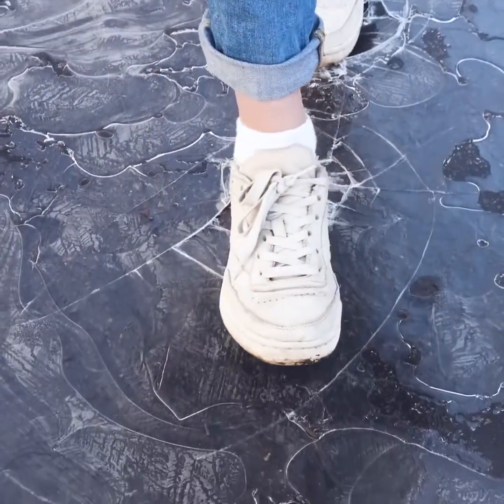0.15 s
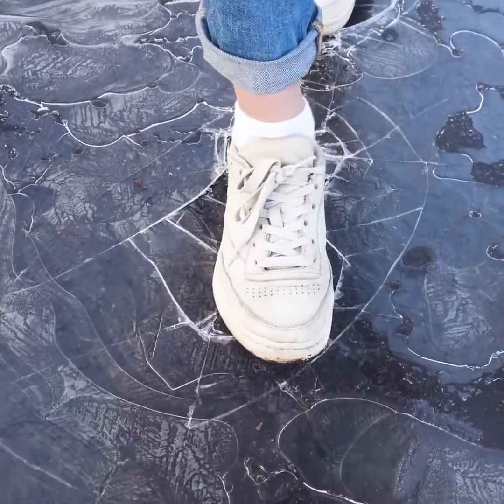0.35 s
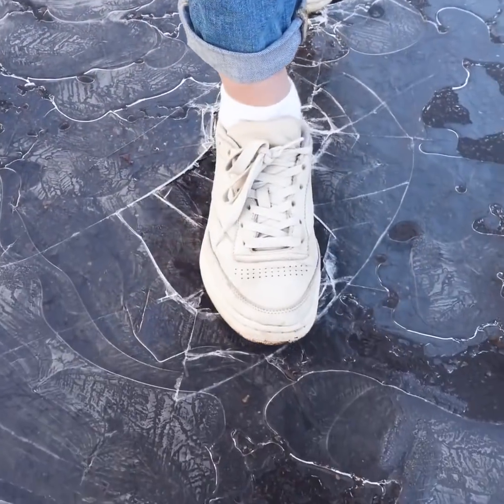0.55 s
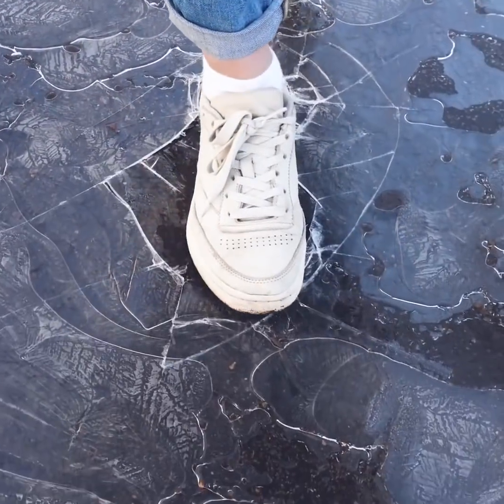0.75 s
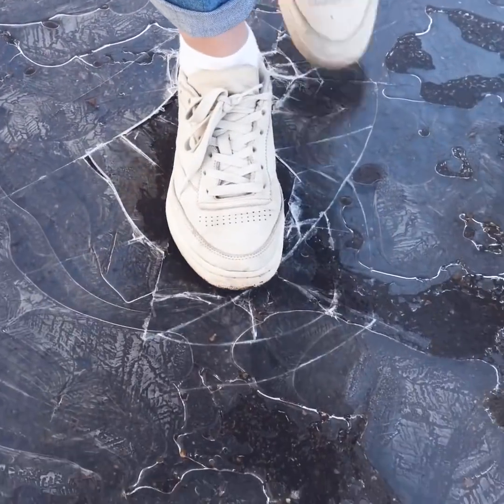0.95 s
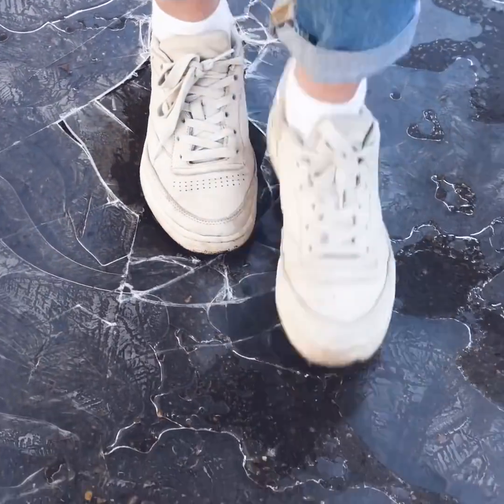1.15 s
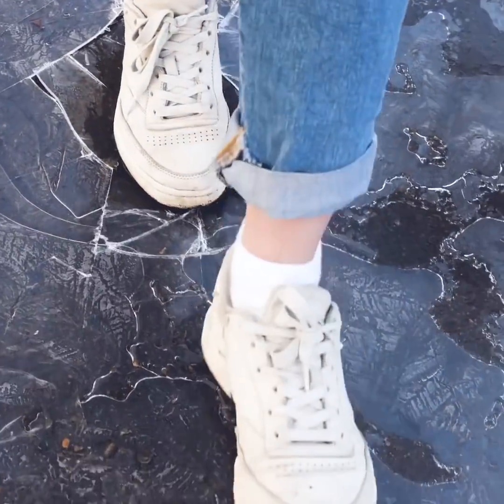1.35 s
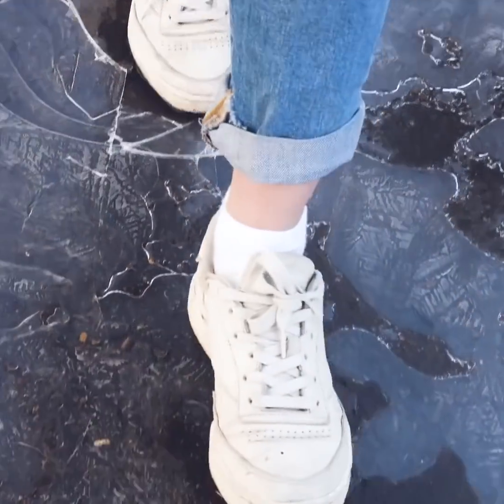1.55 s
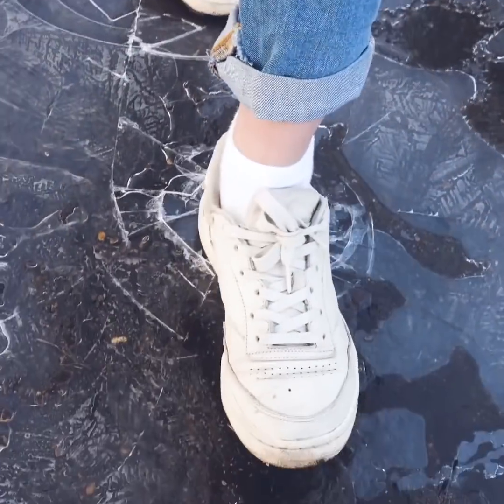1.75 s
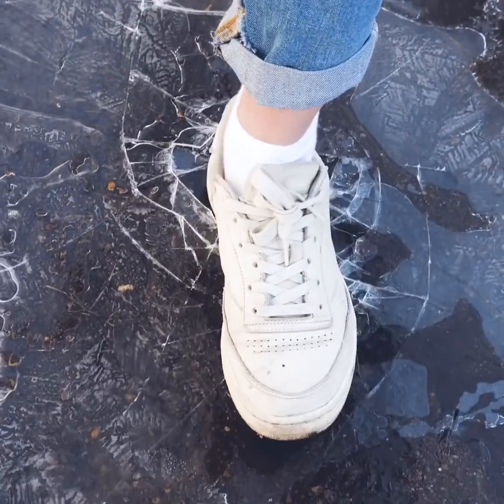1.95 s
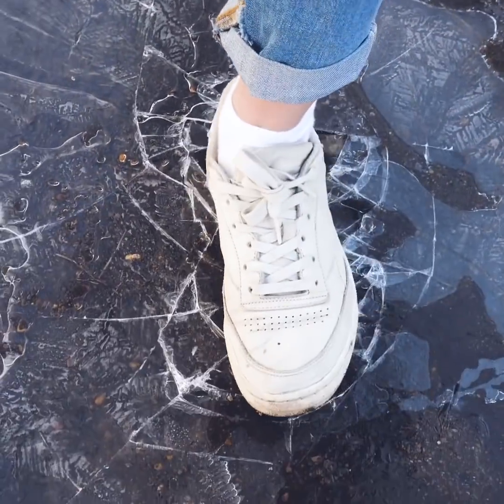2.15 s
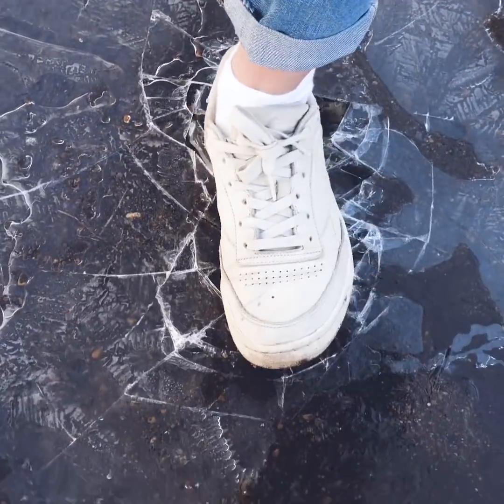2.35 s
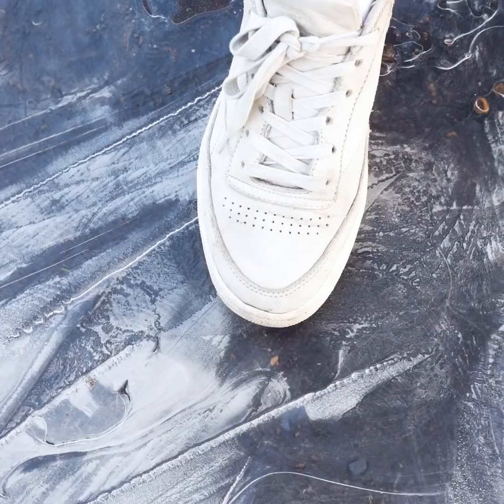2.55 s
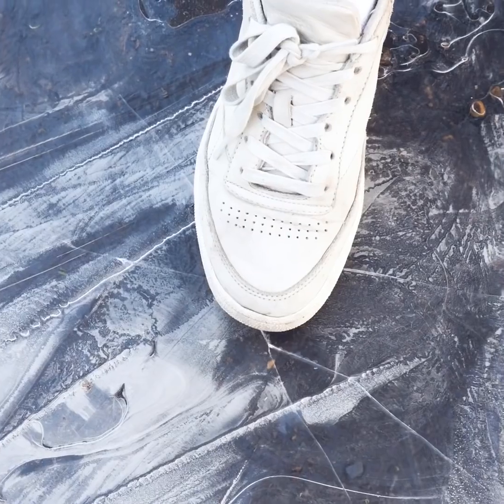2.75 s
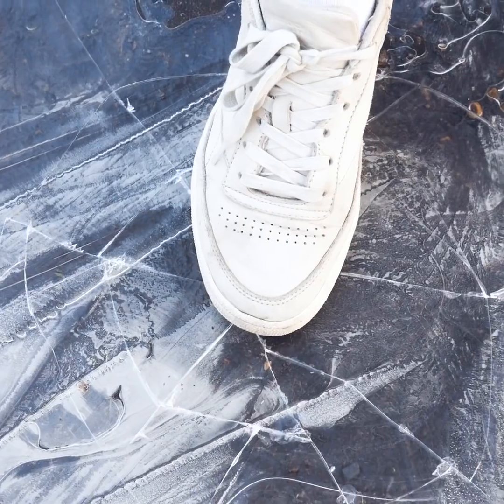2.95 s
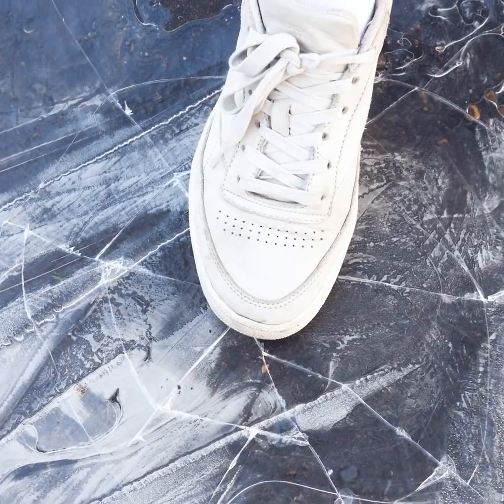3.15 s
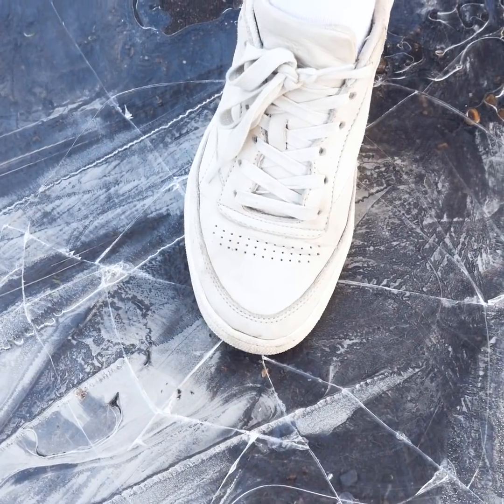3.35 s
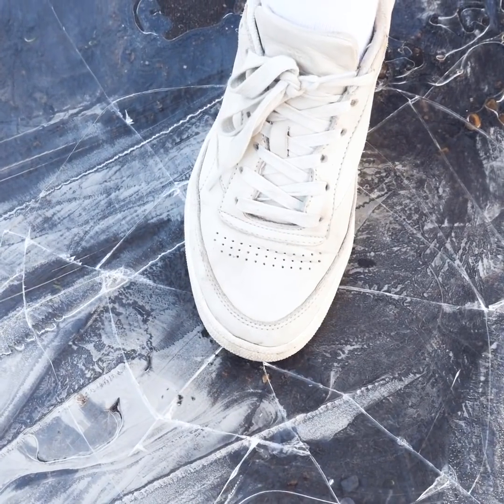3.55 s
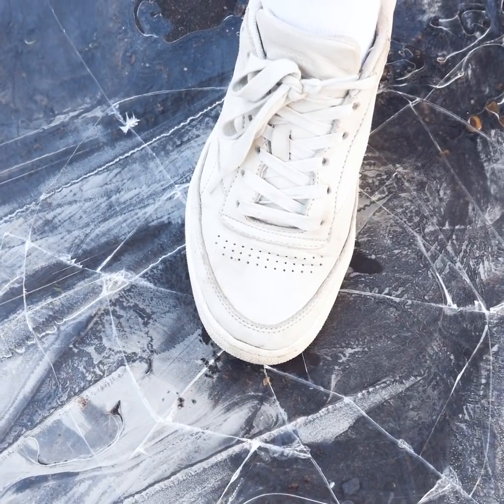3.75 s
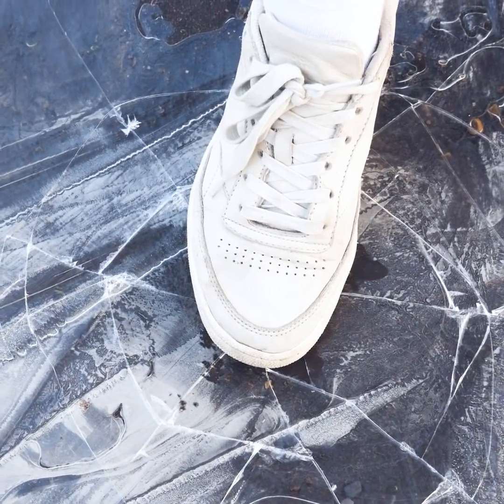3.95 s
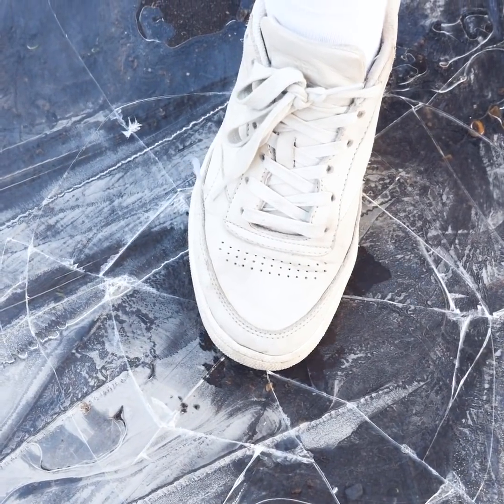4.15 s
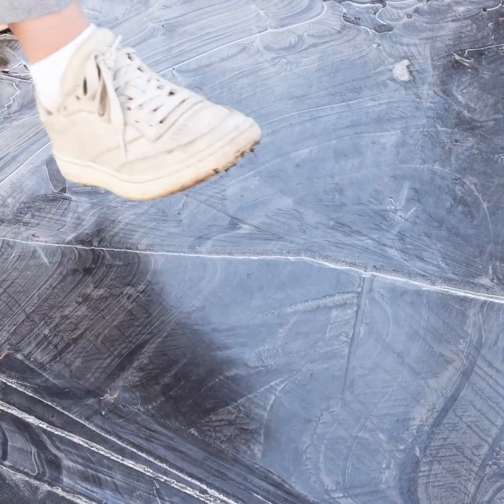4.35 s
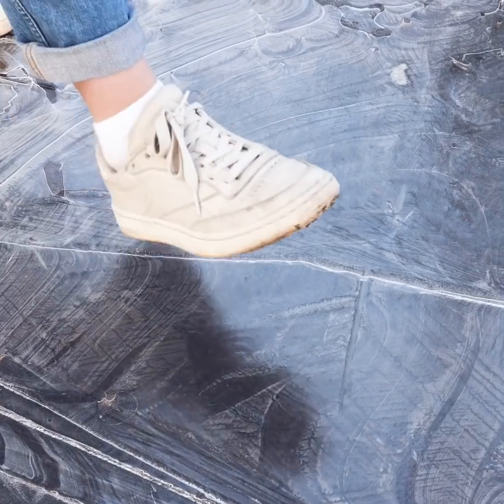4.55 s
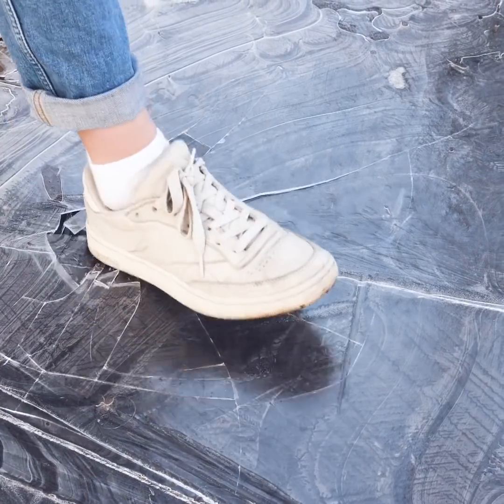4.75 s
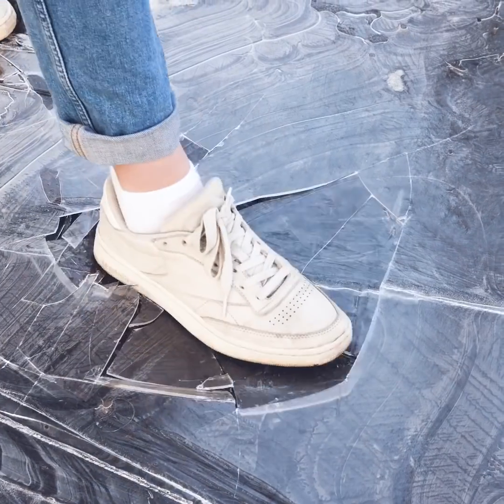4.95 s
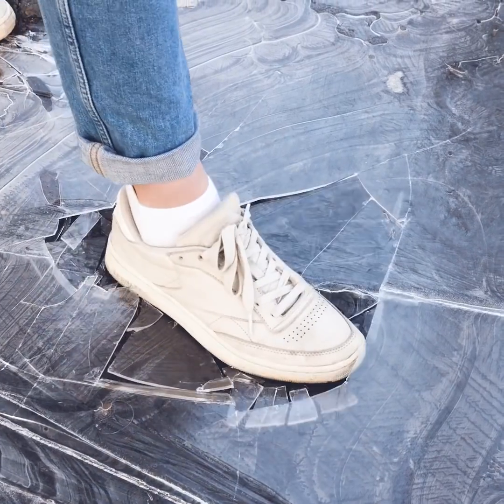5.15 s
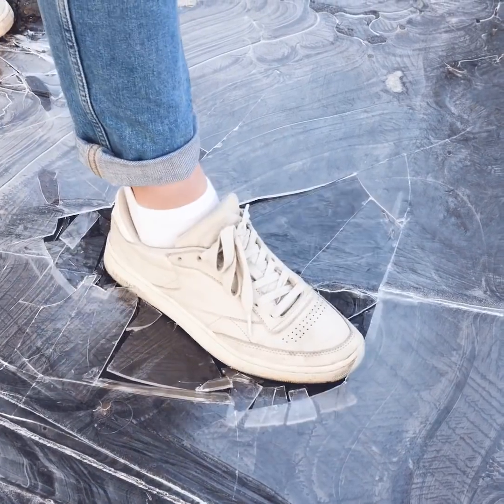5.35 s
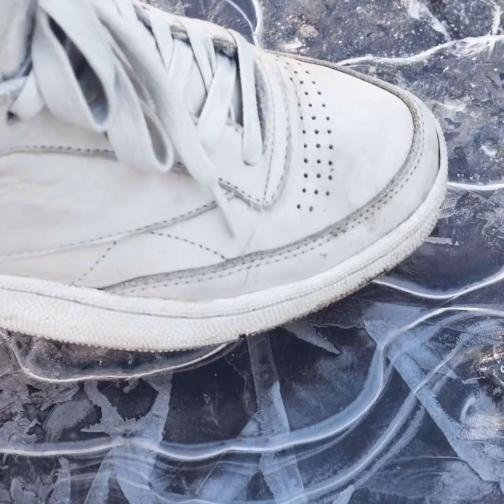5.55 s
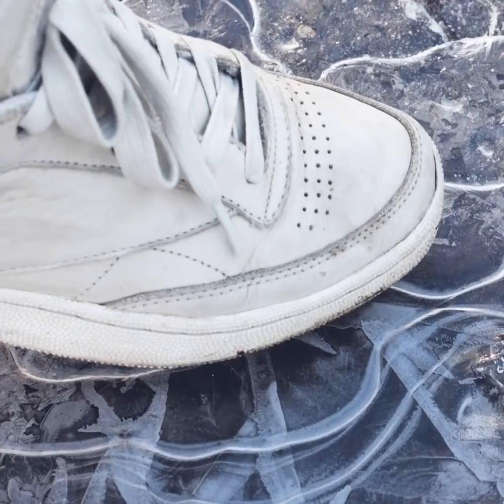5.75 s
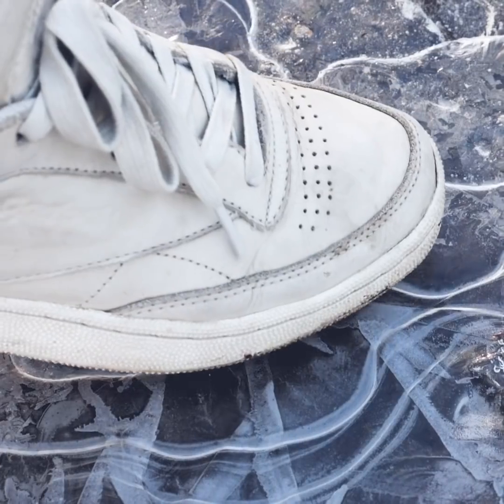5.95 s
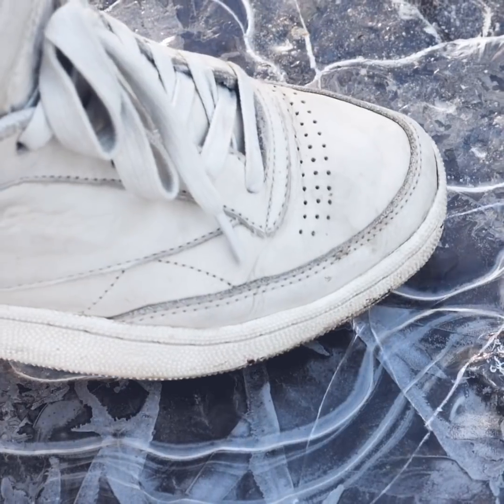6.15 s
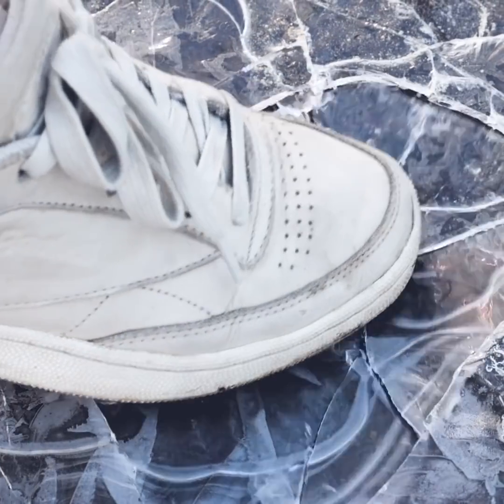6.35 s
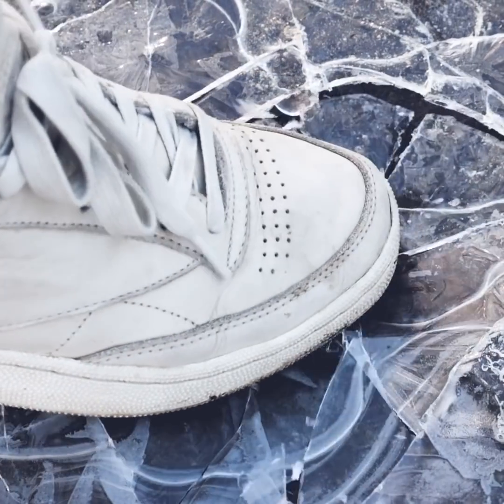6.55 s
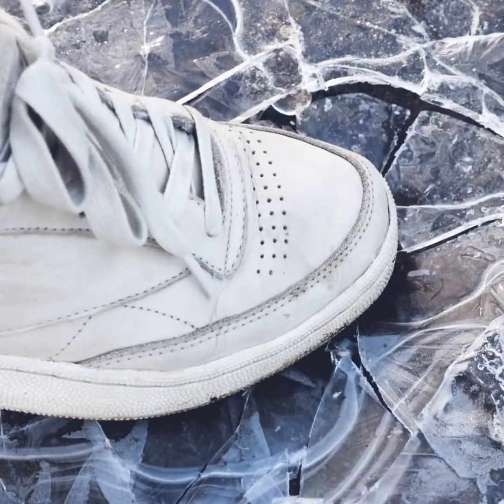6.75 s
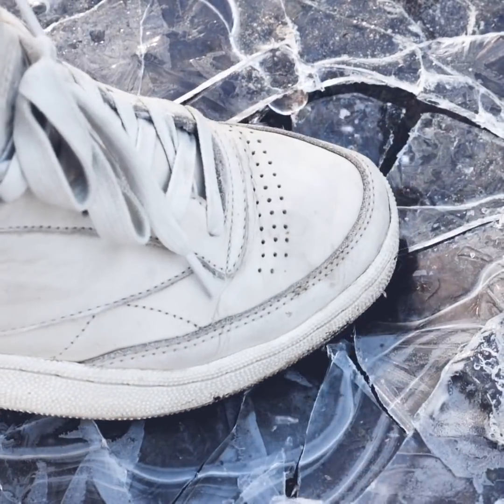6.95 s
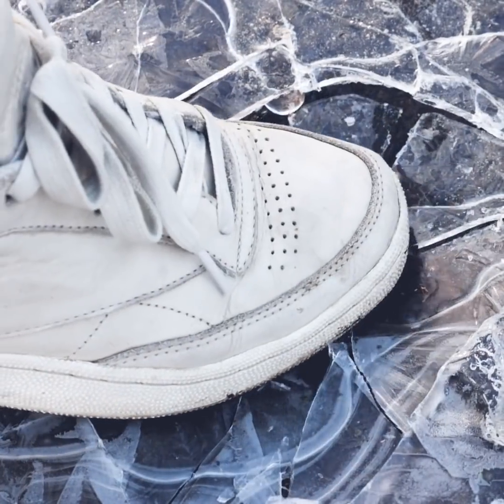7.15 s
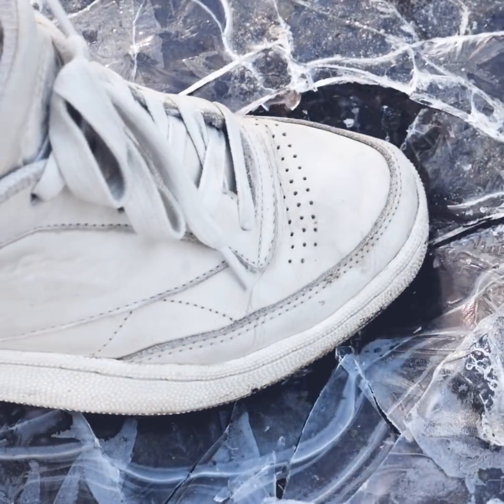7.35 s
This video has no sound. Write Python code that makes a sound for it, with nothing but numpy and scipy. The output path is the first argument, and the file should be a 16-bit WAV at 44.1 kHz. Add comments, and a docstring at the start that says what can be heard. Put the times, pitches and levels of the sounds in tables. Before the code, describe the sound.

Close-up shoes press onto thin puddle ice outdoors, with sharp snaps, glassy crunching and hollow watery thumps over a faint distant traffic hum.

```python
"""Frozen puddles outdoors: shoes press onto thin ice, heard from close by, in four parts cut together.
Single cracks are short noise bursts with a ringing knock; swarms of small ones make the crunch.
Bending waves in the ice sheet bring the treble first. Gliding tones make the thumps of water below.
Shaped noise makes the hum of far traffic and the low rumble. The last part has hardly any treble
above 6.75 kHz. Soft limits round off the loudest peaks."""
import sys
import numpy as np
from scipy import signal
from scipy.fft import rfft, irfft, next_fast_len
from scipy.io import wavfile
from scipy.ndimage import uniform_filter1d, map_coordinates

SR = 44100
rng = np.random.default_rng(int(sys.argv[2]) if len(sys.argv) > 2 else 0)


def materialize(psi):
    """Save the field psi as 16-bit PCM at rate SR to the path in sys.argv[1].

    A 1-D psi becomes a single channel; in a 2-D psi each row is a channel.
    """
    bounded = np.clip(np.atleast_2d(psi).T, -1, 1)
    quanta = np.round(bounded * 32767).astype(np.int16)
    wavfile.write(sys.argv[1], SR, quanta)


N = 330033  # length in samples

# The four parts and their steady levels: start_s, traffic_db, rumble_db,
# hollow_hum_db (steady hollow background hum, like far traffic, before the ice coloring),
# top_treble_db (gain)
PARTS = [(0, -37, -37, -31.5, 3), (2.47, -33, -41, -38.5, -1.5), (4.362, -32.5, -43, -37.5, 3),
         (5.479, -30.5, -49, -48, 0)]
TRAFFIC_COLUMN, RUMBLE_COLUMN, HOLLOW_HUM_COLUMN, TOP_TREBLE_COLUMN = 1, 2, 3, 4
LAST_START_S = PARTS[-1][0]


def amp(db):
    """Turn decibels into an amplitude factor; amp(2 * db) is the matching power."""
    return 10 ** (np.asarray(db) / 20)


def unit(x):
    """Scale a sound to an rms (average strength) of 1."""
    return x / np.sqrt(np.mean(x ** 2) + 1e-20)


def along(points, hz):
    """Read a curve of (pitch_hz, value) points on a logarithmic pitch axis."""
    point_hz, values = np.transpose(points)
    return np.interp(np.log(hz + 1), np.log(point_hz + 1), values)


def curves(rows):
    """Join timed rows by straight lines: one curve for each column after the time."""
    times, *columns = np.transpose(rows)
    return [np.interp(np.arange(N) / SR, times, column) for column in columns]


def per_part(column):
    """Hold one column of the parts table steady through each part."""
    rows = np.array(PARTS)
    part = np.searchsorted(rows[1:, 0] * SR, np.arange(N))
    return rows[part, column]


def plateaus(rows, rise, fall):
    """Level in dB of each (start, length, level, drift) row: a rise, a drifting hold, a fall."""
    start, length, db, drift = np.transpose(rows)[:4, :, None]
    t = np.arange(N) / SR - start
    hold = db + drift * np.clip(t, 0, length)
    return hold + rise * np.minimum(t, 0) - fall * np.maximum(t - length, 0)


def wobble(rate):
    """Make a smooth random curve with rate knots a second."""
    knots = rng.standard_normal(int(N * rate / SR) + 4)
    return map_coordinates(knots, [np.arange(N) * rate / SR])


def filtered(x, response):
    """Change the strength, and perhaps the delay, of each frequency in x."""
    m = next_fast_len(N + SR // 2)  # spare room at the end
    spectrum = rfft(x, m) * response(np.fft.rfftfreq(m, 1 / SR))
    return irfft(spectrum, m)[..., :N]


def rush(gain):
    """Stereo noise of rms 1, colored by a gain for each frequency and partly alike on both sides."""
    # Likeness of left and right: pitch_hz, likeness (1 = the same)
    alike = [(60, 0.97), (240, 0.97), (950, 0.84), (8000, 0.77), (13000, 0.89)]
    turn = lambda hz: np.arccos(np.clip(along(alike, hz), -1, 1)) / 2
    mid_and_side = lambda hz: gain(hz) * [np.cos(turn(hz)), np.sin(turn(hz))]
    mid, side = filtered(rng.standard_normal((2, N)), mid_and_side)
    return unit(np.array([mid + side, mid - side]))


def traffic():
    """Far roads hum: colored noise that wavers in level and steps to a new level in each part."""
    # Coloring in the first three parts, relative: pitch_hz, gain_db
    early_color = [(24, -49), (40, -21), (135, 3.5), (942, -1), (6170, -32), (14500, -22), (16000, -37.5)]
    # Coloring in the last part, relative: pitch_hz, gain_db
    last_color = [(15, -22), (25, -6), (404, -5.5), (2600, -35), (5800, -27.5), (7000, -47)]
    early = rush(lambda hz: amp(along(early_color, hz)))
    last = rush(lambda hz: amp(along(last_color, hz)))
    level_db = per_part(TRAFFIC_COLUMN) + 0.58 * wobble(7.6)
    return amp(level_db) * np.where(np.arange(N) > LAST_START_S * SR, last, early)


def rumble():
    """The loaded sheet and wind rumble: lumpy low noise, steady in each part, with swells on top."""
    # Swells of the rumble: start_s, length_s, level_db, drift_db_per_s
    swells = [(.03, 0.38, -24, -9), (.52, 0.69, -23, -4), (1.4, .13, -28, 45), (1.6, 0.87, -32, 3),
              (6.14, 0.33, -13, -3), (6.51, .15, -15, -5), (6.93, .12, -15, -40)]
    rise_db_per_s, fall_db_per_s = 1499.5, 220
    # Coloring of the rumble, relative: pitch_hz, gain_db
    low_color = [(15, -50), (50, -16), (220, 4), (400, -9), (520, -11), (880, -120)]
    swell_power = amp(2 * plateaus(swells, rise_db_per_s, fall_db_per_s)).sum(0)
    steady_power = amp(2 * per_part(RUMBLE_COLUMN))
    lumps = amp(2.8 * wobble(30))
    noise = unit(lumps * rush(lambda hz: amp(along(low_color, hz))))
    return np.sqrt(swell_power + steady_power) * noise


def thumps():
    """Squeezed water thumps and tipping plates knock: gliding tones, shorter when higher."""
    # Thumps and hollow knocks: peak_s, level_db, pitch_hz (at the peak)
    thump_rows = [(.083, -11, 530), (.106, -11, 494), (.166, -10, 470), (.553, -13, 166), (.59, -12, 239),
                  (.725, -12, 263), (.77, -14, 170), (.832, -9, 250), (.921, -14, 201), (1.06, -14, 240),
                  (1.141, -9, 192), (1.197, -14, 192), (1.288, -17, 200), (1.417, -15, 140),
                  (1.513, -12, 197), (1.601, -14, 580), (2.15, -13, 261), (2.477, -16, 220),
                  (2.617, -15, 360), (2.922, -11, 514), (2.998, -12, 600), (3.046, -11, 554),
                  (3.279, -11, 1150), (4.723, -12, 320), (4.751, -9, 460), (4.767, -10, 570),
                  (4.785, -11, 480), (4.82, -9, 633), (4.85, -12, 642), (4.937, -12, 513),
                  (5.517, -20, 366), (6.133, -6, 165), (6.2, -6, 192), (6.24, -6, 250), (6.276, -6, 215),
                  (6.357, -6, 273), (6.426, -7, 275), (6.521, -7, 232), (6.632, -8, 209), (6.773, -10, 214),
                  (6.939, -6, 230), (6.983, -5, 248)]
    life_at_200_hz_s = .016
    early_glide_per_s, last_glide_per_s = 15, -6  # relative change of pitch
    out, t = np.zeros(N + SR), np.arange(SR // 8) / SR
    for peak_s, db, hz in thump_rows:
        life = life_at_200_hz_s * np.sqrt(200 / hz)
        glide = last_glide_per_s if peak_s > LAST_START_S else early_glide_per_s
        u = t / life
        since_peak = t - life / 2
        turn = 2 * np.pi * (hz * since_peak * (1 + glide * since_peak / 2) + rng.random())
        wave = np.sin(turn) + .25 * np.sin(1.7 * turn)
        envelope = 2 * u * np.exp(.5 - 2 * u * u)  # swells to 1 at the peak, then dies
        at = round((peak_s - life / 2) * SR)
        out[at:at + len(t)] += amp(db) * envelope * wave
    return out[:N]


def overlap(k, hz):
    """Share of band k (0 hollow, 1 middle, 2 treble) at each frequency; the powers add up to 1."""
    # Where the hollow band fades into the middle one, and that into the treble: pitch_hz
    crossings = [800, 1700, 2500, 4500]
    place = np.interp(np.log(hz + 1), np.log(crossings), [0.047, 0.81, 1.21, 1.815])
    return np.cos(np.pi / 2 * np.clip(np.abs(place - k), 0, 1))


def swarm(rate, spread_db, t60):
    """Power of many small cracks at random times and sizes, evened out to a local mean near 1."""
    chance = rng.random((2, N))
    sizes = amp(-2 * spread_db * np.log(chance[1] + 1e-9))
    starts = (chance[0] < rate / SR) * sizes
    t = np.arange(int(t60 * SR) + 2) / SR
    decay = amp(-120 * t / t60)  # the power falls by 60 dB in t60 seconds
    power = np.abs(signal.fftconvolve(starts, decay)[:N])
    return power / (uniform_filter1d(power, SR // 12) + 1e-9)


def shards(rate, hz, cycles):
    """Loose pieces knock at random times, pitches and sides, each a few cycles long; rms 1."""
    rows = rng.standard_normal((int(rate * N / SR), 3))
    at, t = rng.integers(0, N, len(rows)), np.arange(1500)
    pitch = hz * np.exp(0.3 * rows[:, :1]) / SR  # cycles per sample
    rings = amp(2.2 * rows[:, 1:2]) * np.sin(2 * np.pi * pitch * t) * np.exp(-pitch * t / cycles)
    places = (at[:, None] + t).ravel()
    sides = []
    for side in (1, -1):
        heard = rings * amp(side * 1.8 * rows[:, 2:])
        sides.append(np.bincount(places, heard.ravel(), N + len(t))[:N])
    return unit(np.array(sides))


def snaps():
    """Single cracks: noise power in three bands, and the ringing knock of the plate that breaks off."""
    # Cracks, levels before the offsets below: start_s, level_db, knock_db (over level),
    # treble_db (over level), knock_hz, length_s (before the scaling for each band)
    crack_rows = [(0.0165, -7, -4, -15, 566, 0.0032), (0.189, -6.5, -4, -19, 430, 0.0049),
                  (0.231, -4, -8.5, -29, 584, 0.0029), (0.2864, -6.5, -13, -6, 773, 0.01),
                  (0.461, -4, -2.5, -5.5, 420, 0.009), (0.504, -2, 15, -16, 720, 0.0026),
                  (0.595, -5.5, -3.5, 2, 306, 0.0017), (0.771, -3, -6.5, -7.5, 324, 0.0039),
                  (0.8805, -5.5, -13, -8.5, 654, 0.0088), (1.0967, -8.5, 1, 3.5, 1100, 0.0031),
                  (1.6495, -3.5, 3, -2.5, 817, 0.0056), (1.727, -12.5, -1.5, -3, 717, 0.0084),
                  (1.752, -15, 5.5, 4, 750, 0.0056), (1.768, -9, -2, -5, 500, 0.009),
                  (1.789, -5.5, -4.5, -11, 408, 0.0062), (1.825, -10, 3, -8, 560, 0.007),
                  (1.8545, -5, -2, -10, 1085, 0.0069), (1.872, -3.5, -5, -24.5, 1438, 0.012),
                  (1.9105, 3.5, -6, -31, 456, 0.0034), (1.945, -3.5, -5.5, -12, 477, 0.0055),
                  (1.9756, -1.5, -8.5, -18, 484, 0.0063), (2.039, -5, -3, -8, 736, 0.0058),
                  (2.059, -1.5, -14.5, -6, 500, 0.0046), (2.125, -7, -4, -6, 1283, 0.007),
                  (2.16, -1, -14, -12, 1170, 0.0062), (2.175, -7, -3.5, -7, 1280, 0.008),
                  (2.52, -23.5, -7, 11.5, 810, 0.0018), (2.528, -14.5, -8, 4.5, 1260, 0.0029),
                  (2.537, -13, -13, -1, 1190, 0.007), (2.598, -17.5, -6, 6, 540, 0.0039),
                  (2.655, -25.5, -0.5, 8, 721, 0.0062), (2.764, -20, -5, 5, 543, 0.0041),
                  (2.859, -3, -5, -3, 2100, 0.005), (3.127, -9.5, -8, -3.5, 414, 0.017),
                  (3.204, -12, -5.5, 0, 594, 0.012), (3.249, -1.5, -11.5, -10.5, 730, 0.0049),
                  (3.7788, -2.5, -12, -6.5, 500, 0.0084), (4.2096, -0.5, -5, 1, 537, 0.0028),
                  (4.236, -11.5, -2.5, 3.5, 1090, 0.0089), (4.4558, -19.5, -7, -34, 860, 0.003),
                  (4.8857, -16, 5.5, -3, 530, 0.0075), (4.918, -7.5, -9, -2, 1160, 0.016),
                  (4.993, -8, -4, -1, 560, 0.006), (5.068, -8, -4.5, -9, 457, 0.0068),
                  (5.081, -7.5, -4, -1.5, 1180, 0.0089), (6.511, -6, -3, 5, 683, 0.0096),
                  (6.581, 0, -8, -1, 2550, 0.013), (6.609, -3, -4, -3, 516, 0.015),
                  (6.648, -10, -2.5, 4.5, 628, 0.02), (6.6925, -8.5, 1, -4.5, 1300, 0.0076),
                  (6.738, -3, -7, 3, 734, 0.012), (6.758, -6, -4, 1, 512, 0.014),
                  (6.967, -5.5, -2.5, 7.5, 500, 0.013), (7.403, -6, -9, -2.5, 318, 0.0056)]
    # Short bright ticks between the cracks: start_s, level_db
    tick_rows = [(.408, -12), (.7998, -19), (.8232, -22), (.8626, -19), (.9433, -7), (1.005, -7),
                 (1.0859, -17), (1.5762, -11), (1.671, -11), (1.685, -10), (1.897, -6), (2.004, -8),
                 (2.024, -8), (2.112, -10), (2.276, -8), (2.84, -20), (3.024, -4), (3.8557, -19),
                 (5.108, -18), (5.269, -14), (5.656, -21), (5.938, -26), (6.929, -3), (7.024, -5)]
    # What all ticks share, as in the cracks: knock_db, treble_db, knock_hz, length_s
    tick_kind = (-10, -0.3, 900, .0022)
    power, knocks = np.zeros((3, N + SR)), np.zeros(N + SR)
    t = np.arange(SR // 8) / SR
    cracks = crack_rows + [tick + tick_kind for tick in tick_rows]
    chances = rng.random((len(cracks), 2))
    for (start_s, db, knock_db, treble_db, hz, length_s), chance in zip(cracks, chances):
        knock_db = min(knock_db, -6 - db)  # keeps the loudest knocks in check
        at = round(start_s * SR)
        lives = max(length_s, .001) * np.array([[1.2], [1.01], [.8]])  # treble dies first
        tick = 0.85 * np.exp(-t / 0.00036)
        running = np.exp(-(t / lives) ** 3)
        rustle = amp(-7 - 8 * t / lives)
        onset = 1 - np.exp(-t / (0.16 * lives))
        levels = db + np.array([[knock_db - 6.5], [-7], [treble_db + 2.5]])
        power[:, at:at + len(t)] += amp(2 * levels) * (tick + running + rustle) * onset
        overtones = np.sin(2 * np.pi * hz * t * (1.6 + 1.353 * chance[:, None])).sum(0)
        modes = np.sin(2 * np.pi * hz * t) + 0.3 * overtones
        fade = np.exp(-(t / (1.19 * lives[0])) ** 2.14)
        knocks[at:at + len(t)] += amp(db + knock_db - 2.5) * modes * fade
    return power[:, :N], knocks[:N]


def crunching():
    """Power in hollow, middle, treble: ice breaking under the sole; crackle with a hollow background hum."""
    # The sheet gives way, levels before the mixing in ice(): start_s, length_s, level_db,
    # drift_db_per_s, hollow_db (over level), treble_db (over level)
    break_rows = [(0, .028, -21, 0, 1, 5), (.076, .09, -19.5, -10, 0, 6), (.19, .1, -25, 10, -4, 6),
                  (.308, .035, -17, 0, -6, 6), (0.392, 0.15, -22.5, 11, -5, 2),
                  (0.898, 0.3, -24.5, -34, -2.5, 7), (1.658, 0.17, -28, 39, 0.5, 7.5),
                  (1.848, .37, -22.5, -0.5, -3, 5), (2.881, 0.075, -15.5, -55, -0.5, 8),
                  (2.963, 0.37, -23, -2.5, -2, 9), (4.733, 0.37, -17.5, -25, 0, 7.5),
                  (6.139, 0.31, -16.5, 14, -3, 12.5), (6.503, 0.39, -22, -4, -2, 7.5),
                  (6.927, 0.07, -16, -10, -2, 6)]
    rise_db_per_s, fall_db_per_s = 1303.5, 300
    # Loaded ice keeps crackling, levels before the mixing in ice(): time_s, level_db, treble_db (over level)
    crackle_rows = [(.6, -31, 5.5), (1.18, -37, -4), (1.25, -28, 1.5), (1.64, -36.5, 9), (2.25, -24.5, 2),
                    (2.55, -37, -1), (2.87, -43, -20), (3.36, -32.5, 6.5), (3.82, -25, 5),
                    (4.2, -33.5, 4.5), (4.345, -32.5, 6.5), (4.36, -44, -6), (4.715, -43.5, 4),
                    (5.15, -32, 4), (5.32, -30, 1), (5.49, -59.5, 0), (5.65, -64, 20), (5.78, -47, 21),
                    (6.1, -58, 13), (6.9, -30, 8), (7.14, -38, 12), (7.3, -27, 6.5), (7.48, -34, 13.5)]
    crackle_hollow_db = -5  # over level
    breaks = amp(2 * plateaus(break_rows, rise_db_per_s, fall_db_per_s))
    hollow, treble = amp(2 * np.transpose(break_rows)[4:]) @ breaks
    breaking = np.array([hollow, breaks.sum(0), treble])
    level_db, treble_db = curves(crackle_rows)
    crackle = amp(2 * level_db)
    hollow_hum = amp(2 * per_part(HOLLOW_HUM_COLUMN))
    hollow_band = crackle * amp(2 * crackle_hollow_db) + hollow_hum
    return breaking, np.array([hollow_band, crackle, crackle * amp(2 * treble_db)])


def ice():
    """Cracks shake the sheet; its bending waves travel faster the higher they are."""
    # Coloring by the sheet: pitch_hz, gain_db (the lows are cut further below)
    sheet_color = [(300, 5), (1500, 2.5), (4800, -1), (7000, -3.5), (10000, 0.5), (15000, -7.5)]
    snap_power, knocks = snaps()
    fine, coarse = swarm(450, 2.2, .007), swarm(80, 2.6, .04)
    breaking, background = crunching()
    low_shards = np.sqrt(breaking[0]) * amp(-6) * shards(120, 570, 2.3)
    high_shards = np.sqrt(breaking[1]) * amp(-8) * shards(150, 1900, 5.)
    sheet = knocks + low_shards + high_shards
    # smooth, fine and coarse shares of the breaking, for each band
    shares = [(0.13, 0.06, 0.18), (0.14, 0.28, 0.28), (0.3, 0.4, 0.44)]
    for band, (smooth, small, big) in enumerate(shares):
        crunch = breaking[band] * np.abs(smooth + small * fine + big * coarse)
        crackle_and_hum = background[band] * np.abs(.6 + .3 * fine)
        noise = rush(lambda hz: overlap(band, hz))
        sheet = sheet + np.sqrt(snap_power[band] + crunch + crackle_and_hum) * noise
    # the delay shrinks with the square root of the pitch, so the treble comes first
    bending = lambda hz: np.exp(-2j * np.pi * 0.0791 * (np.sqrt(hz + 60) - hz / 220))
    low_cut = lambda hz: 1 / (1 + (300 / (hz + 1)) ** 6)
    return filtered(sheet, lambda hz: amp(along(sheet_color, hz)) * bending(hz) * low_cut(hz))


def scene():
    """Add the background, the water and the ice together."""
    return traffic() + rumble() + thumps() + ice()


def clip(x, top, hard):
    """Soft limit: bends loud peaks toward top; a larger hard makes a sharper bend."""
    return x / (1 + np.abs(x / top) ** hard) ** (1 / hard)


def record(dry):
    """Loud cracks overload the microphone; the last part is dull; a second soft limit ends at 1."""
    air_hz, last_top_hz, top_hz, bottom_hz = 11500, 6750, 16000, 35
    loud = clip(dry, .85, 5.)
    # the parts differ in brightness above air_hz
    air = filtered(loud, lambda hz: 1 / (1 + (air_hz / (hz + 1)) ** 10))
    loud = loud + (amp(per_part(TOP_TREBLE_COLUMN)) - 1) * air
    dull = filtered(loud, lambda hz: 1 / (1 + (hz / last_top_hz) ** 60))
    joined = np.where(np.arange(N) > LAST_START_S * SR, dull, loud)
    band = lambda hz: 1 / (1 + (hz / top_hz) ** 200) / (1 + (bottom_hz / (hz + 1)) ** 4)
    return filtered(clip(joined, 1.0, 2.84), band)


dry = scene()
out = record(dry)
materialize(out)
```